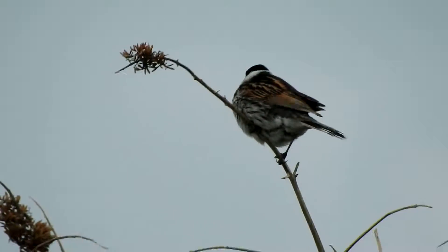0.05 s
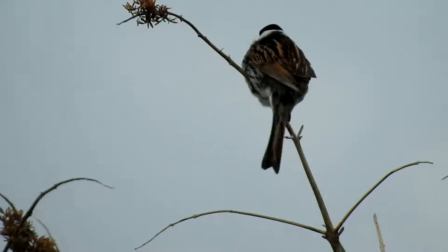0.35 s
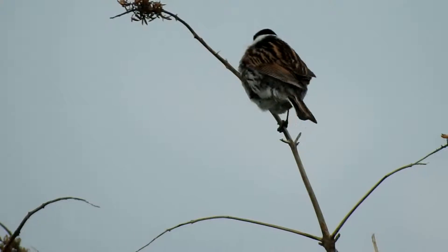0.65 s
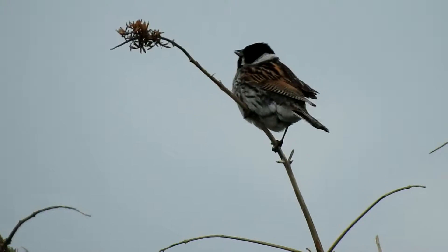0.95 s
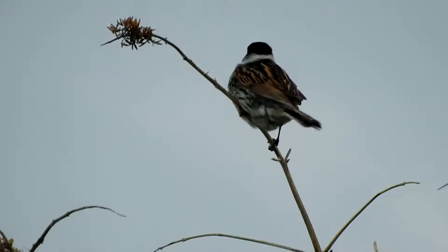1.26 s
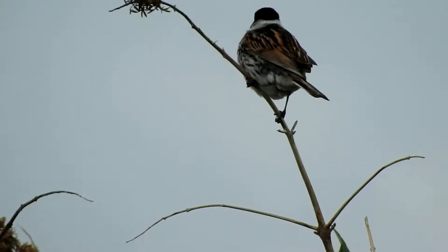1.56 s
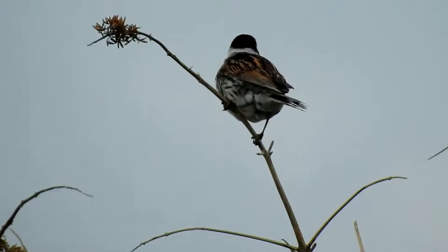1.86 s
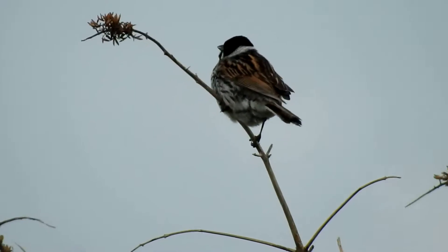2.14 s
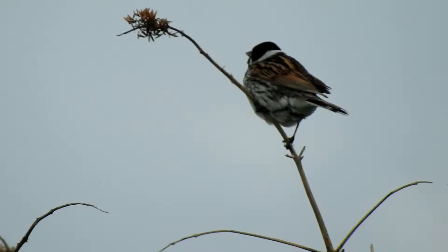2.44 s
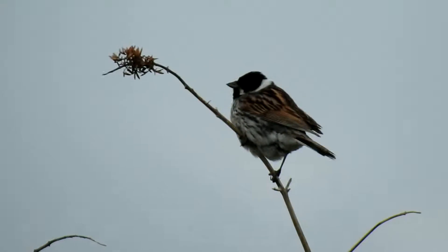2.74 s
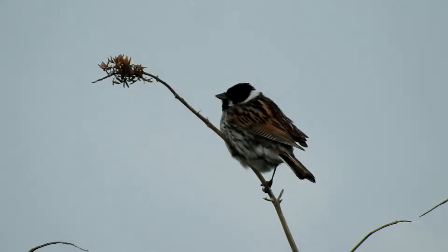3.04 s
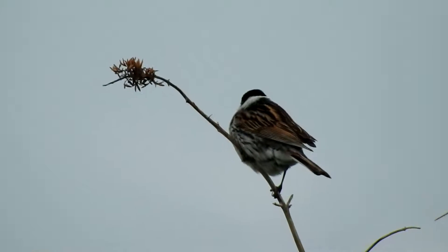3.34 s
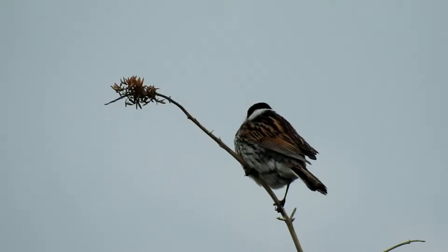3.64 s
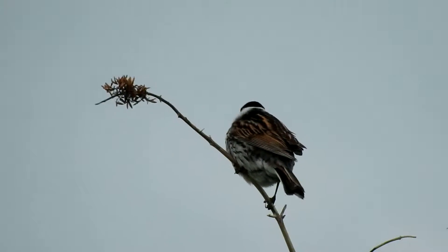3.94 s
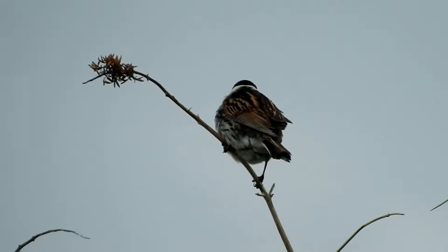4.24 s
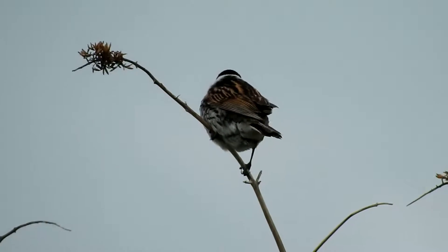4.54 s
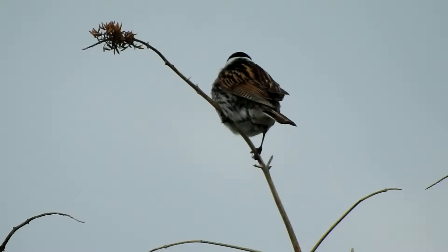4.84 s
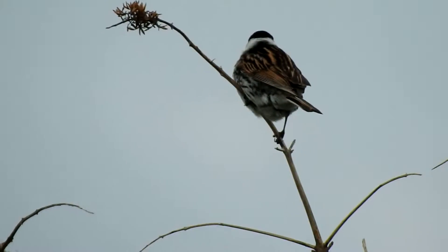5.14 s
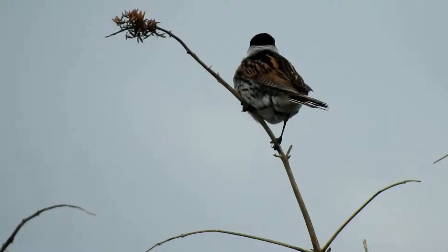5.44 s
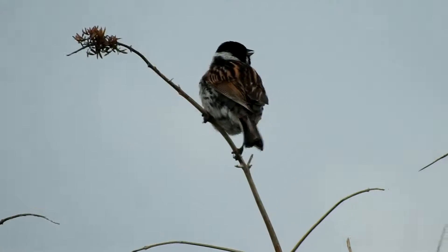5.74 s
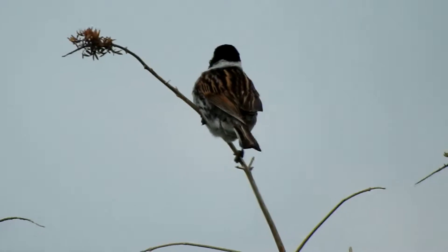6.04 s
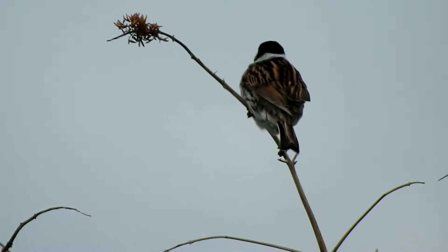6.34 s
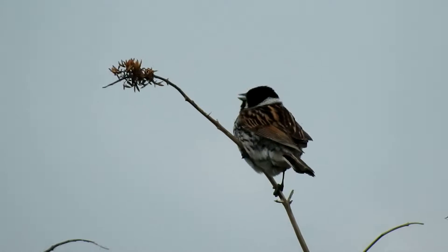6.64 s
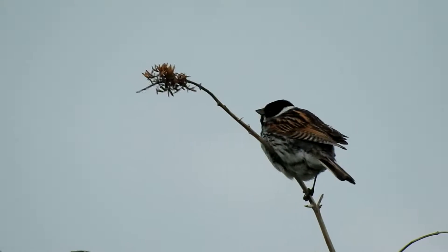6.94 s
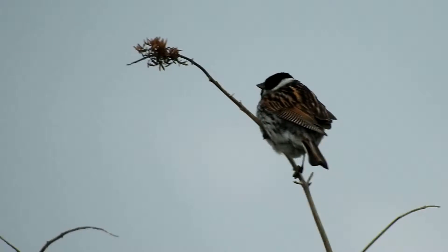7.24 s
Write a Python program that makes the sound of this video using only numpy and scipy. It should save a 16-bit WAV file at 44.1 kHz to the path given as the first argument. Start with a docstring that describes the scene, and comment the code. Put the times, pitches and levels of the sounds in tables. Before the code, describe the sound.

A small bird chirps sharply and sings a buzzy phrase outdoors, with wind buffeting the microphone over distant traffic and another faint bird.

```python
"""Open country, with distant traffic roaring and gusts buffeting the microphone throughout.
A far bird slurs faint notes, then a bunting on a twig sings two sharp chirps and three lisps,
the lisps with both sides of its syrinx at once. In the pause comes one dry tick, close by.
The far bird resumes and the bunting chirps twice more; after a brief hollow hoot it ends
its phrase with a buzz, a falling whistle and two arched notes."""
import sys
import numpy as np
from scipy import signal
from scipy.fft import rfft, irfft, next_fast_len
from scipy.io import wavfile
from scipy.ndimage import uniform_filter1d

SR = 44100
rng = np.random.default_rng(int(sys.argv[2]) if len(sys.argv) > 2 else 0)


def output_pcm(signal):
    """Save a mono or channel-first signal as 16-bit PCM at the path in sys.argv[1].

    Samples are clipped to [-1, 1] before scaling.
    """
    pcm = np.clip(np.atleast_2d(signal).T, -1, 1) * 32767
    wavfile.write(sys.argv[1], SR, np.round(pcm).astype(np.int16))


N = 330309
TIME = np.arange(N) / SR
CUTOFF_HZ = 15800

# Note shapes for the two songs. Each row: ms from the note's time, pitch in Hz, relative level in dB.
CHIRP = [(-43.5, 4850, -31.5), (-32.5, 5000, -11.5), (-12.5, 5330, -2), (-2.5, 5650, -6.5), (-2, 6300, -8),
         (3, 4800, -4), (5, 4000, -17.5), (10, 4700, -4.5), (23.5, 4880, -0.5), (49, 4760, -5),
         (66.5, 4700, -4), (96, 4670, -24.5)]
BUZZ_PULSE = [(0, 5320, -19), (2, 4810, -1), (5, 4560, -2), (8, 4230, -4), (12, 4060, -14)]
BUZZ_FALL = [(0, 4500, -9), (4, 4050, -1), (11, 3550, -7), (18, 3200, -11), (22, 3150, -22)]
ARCH = [(0, 3850, -19), (6, 4350, -3), (13, 4620, -6.5), (21.65, 4250, -1), (31.3, 3750, -9.5),
        (38.8, 3450, -21.5)]
LOW_ARCH = [(0, 2930, -4.5), (8, 3300, -2.5), (16.9, 3540, -3), (26.1, 3380, -3.5), (33.7, 2700, -7)]
SLUR = [(0, 4400, -17.5), (8, 4700, -2.5), (18, 4300, 0.5), (28, 3950, -9.5), (39, 3750, -22)]
PIP = [(0, 4600, -10.5), (8, 5000, -5), (18, 5050, -9.5)]
# The hardest shoves on the microphone. Each row: start in seconds, relative peak in dB, pitch in Hz.
BUFFETS = [(0.476, -15.5, 167), (0.593, -18, 229), (0.662, -19.5, 250), (0.748, -17, 167),
           (0.843, -17, 256), (1.177, -13, 191), (1.441, -13, 231), (1.943, -8, 166), (2.029, -9, 144),
           (2.107, -12, 178), (2.156, -9.5, 197), (2.647, -18, 156), (4.02, -12, 134), (4.203, -11.5, 181),
           (4.283, -10, 214), (4.341, -7, 175), (4.449, -6, 165), (4.489, -7.5, 288), (4.719, -12, 196),
           (4.853, -8, 160), (4.897, -9.5, 182), (4.967, -12, 207), (5.387, -6, 211), (5.487, -7, 192),
           (5.674, -7.5, 194), (5.948, -16, 304), (6.358, -10.5, 257), (6.406, -14, 148)]
# Stereo image of the far roar and rumble. Each row: frequency in Hz, left-right likeness from 0 to 1.
DISTANT_LIKENESS = [(100, 0.22), (300, 0.98), (600, 0.9536), (2000, 0.87)]


def from_db(db):
    """Decibels to gain."""
    return 10 ** (np.asarray(db) / 20)


def unit_rms(x):
    """Scale to unit power."""
    return x / np.sqrt(np.mean(x ** 2) + 1e-20)


def over_time(rows):
    """Join rows of seconds and value by straight lines."""
    return np.interp(TIME, *np.transpose(rows))


def at_hz(points, hz):
    """Read a spectrum on a log-frequency axis."""
    known_hz, values = np.transpose(points)
    return np.interp(np.log(hz + 1e-9), np.log(known_hz), values)


def band(x, low_hz, high_hz, order=2):
    """Causal band-pass."""
    sos = signal.butter(order, [low_hz, min(high_hz, .45 * SR)], "band", fs=SR, output="sos")
    return signal.sosfilt(sos, x + 1e-18)


def add(out, start_s, sound):
    """Mix a sound in at a time."""
    i = max(round(start_s * SR), 0)
    out[..., i:i + sound.shape[-1]] += sound[..., :max(N - i, 0)]


def air_noise(spectrum, likeness):
    """Stereo noise of a given colour and left-right likeness, at unit power."""
    size = next_fast_len(N)
    hz = np.arange(size // 2 + 1) * SR / size
    mid, side = rfft(rng.standard_normal((2, size))) * from_db(at_hz(spectrum, hz))
    alike = np.clip(at_hz(likeness, hz), 0, 1)
    left_right = np.sqrt(1 + alike) * mid + np.sqrt(1 - alike) * side * [[1], [-1]]
    return unit_rms(irfft(left_right, size)[:, :N])


def syrinx_note(shape, ratio, waver=0.009, octave_db=-36, beak_hz=8950):
    """The syrinx gives a gliding, slightly unsteady near-sine with a weak octave."""
    ms, hz, db = np.transpose(shape)
    ms = np.sort(ms)
    at = np.arange(ms[0], ms[-1], 1000 / SR)
    tremor = unit_rms(band(rng.standard_normal(SR // 2), 80, 900))[-len(at):]
    pitch = uniform_filter1d(np.interp(at, ms, hz), size=60) * ratio * (1 + waver * tremor)
    phase = 2 * np.pi * np.cumsum(pitch) / SR
    octave = from_db(octave_db) / (1 + (2 * pitch / beak_hz) ** 30)   # passes the beak only on low notes
    fade = np.clip(np.minimum(at - ms[0], ms[-1] - at), 0, 1)
    return fade * from_db(np.interp(at, ms, db)) * (np.sin(phase) + octave * np.sin(2 * phase))


def sing(notes):
    """Place each note; the two sides of the syrinx may overlap."""
    out = np.zeros(N)
    for s, db, ratio, shape in notes:
        add(out, s + shape[0][0] / 1000, from_db(db) * syrinx_note(shape, ratio))
    return out


def bunting(coupling=5.5):
    """Two phrases from a twig; where both sides of the syrinx sound they mix and add a high rasp."""
    # Chirps, the buzz's end and closing notes. Each row: time in seconds, level in dB, pitch ratio, shape.
    song = [(.941, -22, 1.006, CHIRP), (1.428, -18.5, .997, CHIRP), (5.095, -22.5, 1.01, CHIRP),
            (5.555, -16.5, 1.004, CHIRP), (6.141, -22, 1, BUZZ_PULSE), (6.146, -24, 1.03, BUZZ_FALL),
            (6.162, -24, 1.12, BUZZ_FALL), (6.175, -28.5, .92, BUZZ_FALL), (6.188, -32, 1.03, BUZZ_FALL),
            (6.739, -21.5, 1.03, ARCH), (6.782, -32, 1.046, LOW_ARCH)]
    voice = sing(song + lisps() + buzz())
    rasp = coupling * band(voice ** 3, 5700, 10000, order=4)
    return voice + rasp + whistle()


def lisps(upper_db=-3.5, upper_ratio=1.027):
    """Notes from both sides of the syrinx at once: a rising upper voice over a wavering lower one."""
    # The two voices. Each row: ms from the note's time, pitch in Hz, relative level in dB.
    upper_voice = [(-10.5, 4000, -23), (3, 4350, -7), (7.5, 4800, -3), (12.5, 4963, -9),
                   (19.5, 5200, -26.5)]
    lower_voice = [(7, 3600, -23), (17, 4100, -12), (26, 4550, 0.5), (30.5, 5000, -11), (33, 4300, 0),
                   (37, 5100, -7), (41.5, 4200, -5), (47, 4050, -15), (55, 4100, -25)]
    # The three lisps. Each row: time in seconds, level in dB, pitch ratio.
    notes = [(1.860, -18.5, 1.007), (1.952, -16, 1), (2.053, -17, .995)]
    lower = [(s, db, ratio, lower_voice) for s, db, ratio in notes]
    upper = [(s, db + upper_db, ratio * upper_ratio, upper_voice) for s, db, ratio in notes]
    return lower + upper


def buzz(start_s=5.9995, period_s=.0108, count=13, level_db=-17, soft_db=-7.5, attack_s=.028):
    """A fast run of falling pulses, each a little different, swelling from a soft start."""
    jitter = rng.standard_normal((count, 3)) * [.0007, 1.2, .02]   # seconds, dB, pitch ratio
    age = period_s * np.arange(count)
    effort_db = soft_db * np.maximum(1 - age / attack_s, 0)
    ratios = 1 + .0063 * effort_db + .25 * (age - age.mean())   # pitch rises with effort and creeps up
    return [(start_s + s + late, level_db + db + louder, ratio + sharp, BUZZ_PULSE)
            for s, db, ratio, (late, louder, sharp) in zip(age, effort_db, ratios, jitter)]


def whistle(start_s=6.583, level_db=-23, flutter_hz=118):
    """A long falling whistle whose level flutters quickly."""
    # The glide. Each row: time in ms, pitch in Hz, relative level in dB.
    glide = [(0, 6600, -27.5), (22, 6815, -11), (58.2, 6430, -14), (108, 6000, -9), (131.4, 5720, -3.5),
             (147, 5480, -1.5), (159.3, 5430, -3), (160, 5700, -25)]
    flutter = 1 + .6 * np.sin(2 * np.pi * flutter_hz * TIME)
    return flutter * sing([(start_s, level_db, 1, glide)])


def far_bird():
    """Another bird, further off, sings faint slurs and pips."""
    # Its song. Each row: start in seconds, level in dB, pitch ratio, shape.
    song = [(.097, -43.5, 0.96, PIP), (.542, -48.5, 1.036, SLUR), (.648, -46, 1.064, SLUR),
            (.672, -42, 0.99, PIP), (1.295, -48, 1.03, SLUR), (4.682, -47, 1.056, SLUR),
            (4.792, -51, 1.04, SLUR), (5.270, -47.5, 1.114, SLUR), (5.61, -35, 1.24, SLUR),
            (5.694, -42, 0.968, SLUR), (5.817, -38, 0.97, SLUR), (5.962, -36.5, 0.992, SLUR),
            (6.300, -44.5, 1.02, SLUR), (6.462, -43.5, 1.01, SLUR), (6.503, -34.5, 1.007, SLUR),
            (6.606, -37, 1.001, SLUR), (6.878, -46, 1.006, SLUR), (7.077, -49, 1, SLUR),
            (7.106, -42.5, 1.01, PIP), (7.391, -38.5, 0.997, SLUR)]
    return sing(song)


def open_country(x, stems_db=-14, stems_t60=0.23, bushes_db=-17.5, bushes_t60=1.2):
    """A few echoes, quick scatter from nearby stems and a faint tail from further bushes."""
    # Reflections from ground and bushes. Each row: delay in ms, level in dB.
    reflections = [(6, -14), (11.5, -12), (19, -14), (44, -22)]
    t = TIME[:SR]
    stems = unit_rms(rng.standard_normal(SR) + 0.4 * rng.standard_normal((2, SR)))
    stems = unit_rms(stems * from_db(-60 * t / stems_t60) * (t > .005))
    bushes = unit_rms(rng.standard_normal((2, SR)) * from_db(-60 * t / bushes_t60) * (t > .02))
    scatter = (from_db(stems_db) * stems + from_db(bushes_db) * bushes) / np.sqrt(SR)
    echoes = sum(from_db(db) * np.pad(x, (round(ms * SR / 1000), 0))[:N] for ms, db in reflections)
    return x + echoes + signal.fftconvolve(x[None], scatter, axes=1)[:, :N]


def birds(pan_db=1.28, far_gain_db=0.5):
    """Both birds sit slightly to the left of the microphone."""
    near = open_country(bunting())
    far = from_db(far_gain_db) * open_country(far_bird(), stems_db=-13)
    return (near + far) * from_db([[pan_db], [-pan_db]])


def wind_force(rise_s=.03, breeze_db=-47):
    """The strongest gust of the moment over a light breeze, as a gain; gusts rise, hold and die away."""
    # Gusts. Each row: arrival in seconds, hold in seconds, level in dB, seconds to fall 20 dB.
    gusts = [(0.027, 0.085, -38.5, .15), (0.378, 0.13, -29.5, .1), (0.589, .27, -26.5, 0.03),
             (1.08, .08, -33, 0.5), (1.178, .05, -23, .24), (1.44, 0.033, -23.5, 0.2),
             (1.951, .22, -15, 0.25), (2.649, .07, -25.5, 0.08), (2.828, 0.027, -29.5, 0.45),
             (3.598, 0.089, -30.5, 0.6), (3.92, .11, -25.5, 0.3), (4.201, .33, -16, 0.17),
             (4.598, 0.069, -18.5, 0.12), (4.848, .13, -18, .12), (5.099, .18, -27, .1),
             (5.457, 0.29, -17, .4), (6.089, .33, -22.5, .08), (6.84, .04, -31.5, .15)]
    t = TIME[::40]
    levels = [db - 20 * (np.maximum(s - t, 0) / rise_s + np.maximum(t - s - hold, 0) / fall)
              for s, hold, db, fall in gusts]
    strongest = from_db(np.max(levels, axis=0))
    return np.interp(TIME, t, np.hypot(strongest, from_db(breeze_db)))


def wind(level_db=-1.6, evenness=0.8, overload=.54):
    """Lumpy eddies rumble on each microphone port separately; the hardest overload the capsule."""
    # Colour of the eddies. Each row: frequency in Hz, relative density in dB.
    spectrum = [(10, -61.5), (40, -32.5), (65, -12.5), (90, -20.5), (125, -3.5), (185, 0.5), (320, -7),
                (440, -14), (650, -25), (1200, -38.5), (3000, -51), (6000, -60), (15000, -76)]
    # Their stereo image. Each row: frequency in Hz, left-right likeness.
    likeness = [(60, 0.057), (2000, 0.23)]
    eddies = air_noise(spectrum, likeness)
    lumps = from_db(3.6 * unit_rms(band(rng.standard_normal(N), 10, 45)))
    eddies = eddies * lumps
    swell = np.sqrt(uniform_filter1d(np.mean(eddies ** 2, axis=0), size=2000))
    push = from_db(level_db) * wind_force() * unit_rms(eddies / swell ** evenness) + buffets()
    return push / (1 + np.abs(push / overload) ** 10) ** (1 / 10)


def buffets(gain_db=2.5, rise_s=0.0078, spread=0.1):
    """A single eddy shoves each port to and fro for two or three swings."""
    out, t = np.zeros((2, N)), TIME[:SR // 12]
    swell = (t / rise_s * np.exp(1 - t / rise_s)) ** 2
    for s, db, centre_hz in BUFFETS:
        pitch, glide, phase, strength = rng.standard_normal((4, 2, 1))
        hz = centre_hz * np.exp(spread * (pitch + glide * np.tanh(t / rise_s - 1)))
        swings = np.sin(2 * np.pi * np.cumsum(hz, axis=1) / SR + phase)
        add(out, s, from_db(db + gain_db + 2 * strength) * swell * swings)
    return out


def buffet_ticks(level_db=-39, growth=2.2, crest_s=.008, t60=.004, low_hz=2500):
    """The hardest buffets give a dry tick at their crest, which grows faster than the buffet does."""
    out, t = np.zeros((2, N)), TIME[:SR // 50]
    hardest_db = max(db for _, db, _ in BUFFETS)
    for s, db, _ in BUFFETS:
        envelope = from_db(level_db + growth * (db - hardest_db) - 60 * t / t60)
        add(out, s + crest_s, envelope * rng.standard_normal((2, len(t))))
    return band(out, low_hz, CUTOFF_HZ, order=1)


def crackle(level_db=-11, bright_db=-24, most_per_s=60):
    """Strong gusts set off sparse tiny clicks on each side; the strongest reach the high treble."""
    gust = wind_force()
    strength = gust / gust.max()
    sizes = rng.uniform(0.62, 1, (2, N)) * rng.choice([-1, 1], (2, N))
    clicks = sizes * (rng.random((2, N)) < most_per_s * strength / SR)
    dull = band(clicks * strength ** 0.088, 1200, 3700, order=3)
    bright = from_db(bright_db) * clicks ** 3 * strength
    return from_db(level_db) * (dull + bright)


def tick(start_s=3.365, level_db=-28.5, t60=.028, body_db=5, body_hz=1200):
    """One small dry tick close to the microphone: a bright snap over a hollow body."""
    out, t = np.zeros((2, N)), TIME[:SR // 10]
    snap = unit_rms(band(rng.standard_normal((2, len(t))), 900, 7300, order=6))
    body = unit_rms(band(rng.standard_normal(len(t)), body_hz / 1.28, body_hz * 1.13))
    add(out, start_s, from_db(level_db - 60 * t / t60) * (snap + from_db(body_db) * body))
    return out


def hoot(middle_s=5.923, peak_db=-21.5, pitch_hz=642, length_s=0.029):
    """One brief hollow note, low above the rumble."""
    out, t = np.zeros(N), TIME[:int(length_s * SR)]
    tone = np.hanning(len(t)) * np.sin(2 * np.pi * pitch_hz * t)
    add(out, middle_s - length_s / 2, from_db(peak_db) * tone)
    return out


def traffic(gain_db=3.0, steepness=24, beyond_db=-14):
    """Far tyre roar; it steps down above an edge that wanders."""
    # Colour of the roar. Each row: frequency in Hz, relative density in dB.
    spectrum = [(25, -32), (60, -18), (130, -1), (250, -4), (450, -3.5), (700, 0), (1000, 2.5), (1300, -2),
                (1600, -10), (1900, -8), (2400, -24.5), (4000, -37), (9000, -57)]
    # Its slow swell. Each row: time in seconds, relative level in dB.
    levels = [(0, -37), (1, -37.5), (1.8, -35), (3, -35.5), (4.5, -35), (5.3, -36.5), (6.8, -37),
              (7.49, -39.5)]
    hz, s, frames = signal.stft(air_noise(spectrum, DISTANT_LIKENESS), SR, nperseg=1024)
    below_edge = 1 / (1 + (hz[:, None] / traffic_edge(s)) ** steepness)
    dulled = frames * np.sqrt(below_edge + from_db(beyond_db) ** 2)
    return from_db(over_time(levels) + gain_db) * signal.istft(dulled, SR)[1][:, :N]


def traffic_edge(s, open_hz=1824):
    """The upper edge of the roar, in Hz, sinks and recovers smoothly now and then."""
    # Dull spells. Each row: middle in seconds, half length in seconds, lowest edge in Hz.
    spells = [(.32, .09, 1490), (1.01, 0.072, 1370), (2.47, .12, 1550), (3.17, .12, 950), (6.8, .15, 690),
              (7.474, 0.11, 950)]
    dips = [(low_hz / open_hz) ** np.exp(-((s - middle) / half) ** 2) for middle, half, low_hz in spells]
    return open_hz * np.prod(dips, axis=0)


def rumble():
    """A deep far rumble that comes and goes."""
    # Its colour. Each row: frequency in Hz, relative density in dB.
    spectrum = [(12, -59.5), (25, -28.5), (55, -4.5), (85, -4.5), (110, 4.5), (150, -8.5), (300, -38.5),
                (1000, -100)]
    # Its swell. Each row: time in seconds, level in dB.
    levels = [(0, -49.5), (1.7, -46), (3.3, -44), (6.4, -46.5), (6.8, -39), (7.1, -48.5), (7.49, -38)]
    return from_db(over_time(levels)) * air_noise(spectrum, DISTANT_LIKENESS)


def hiss(level_db=-51):
    """A faint steady hiss behind everything."""
    # Its colour. Each row: frequency in Hz, relative density in dB.
    spectrum = [(500, -22.5), (2000, 0.5), (3100, .3), (3900, -5.5), (4700, -1.5), (6400, 0.5), (7600, -10),
                (10000, -15.5), (12500, -19.5), (15500, -26)]
    # Its stereo image. Each row: frequency in Hz, left-right likeness.
    likeness = [(2000, 0.644), (3200, 0.792), (4000, 0.37), (6000, 0.25), (8000, 0)]
    return from_db(level_db) * air_noise(spectrum, likeness)


def scene():
    """Two birds over distant traffic, with wind on the microphone."""
    return birds() + traffic() + rumble() + wind() + buffet_ticks() + crackle() + tick() + hoot() + hiss()


def record(dry, low_cut_hz=42):
    """The deepest bass and the top are cut."""
    dry = signal.sosfilt(signal.butter(2, low_cut_hz, "high", fs=SR, output="sos"), dry)
    return signal.sosfiltfilt(signal.ellip(10, .1, 60, CUTOFF_HZ, fs=SR, output="sos"), dry)


dry = scene()
out = record(dry)
output_pcm(out)
```